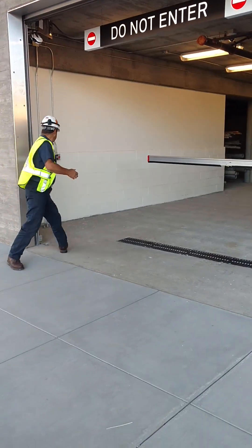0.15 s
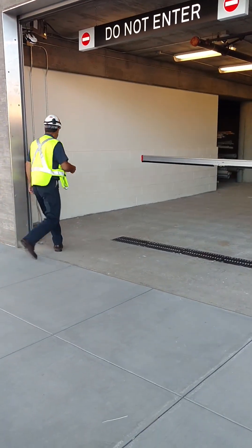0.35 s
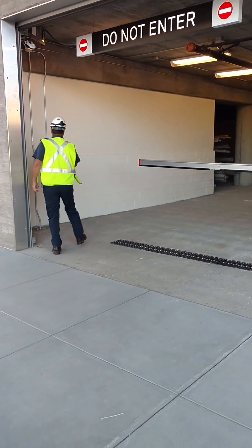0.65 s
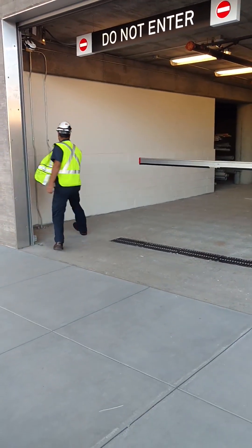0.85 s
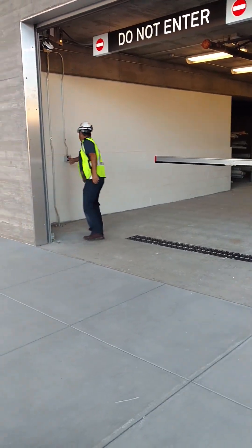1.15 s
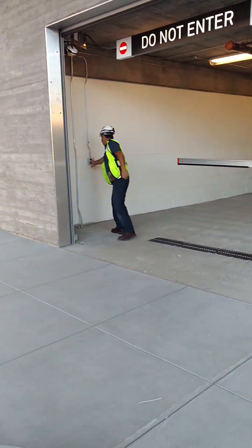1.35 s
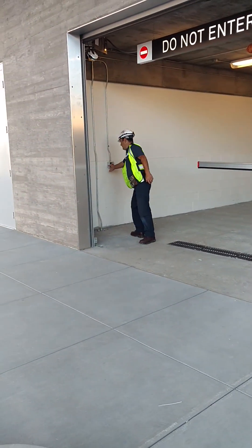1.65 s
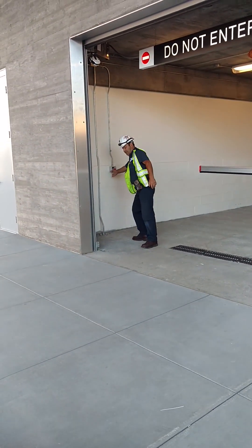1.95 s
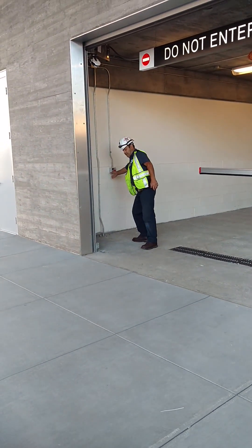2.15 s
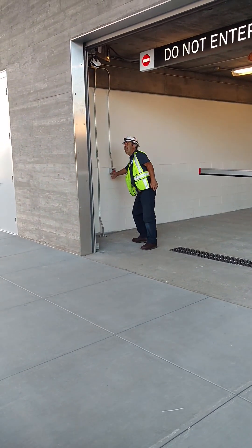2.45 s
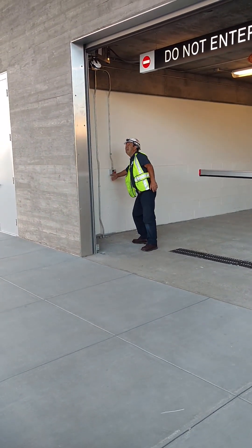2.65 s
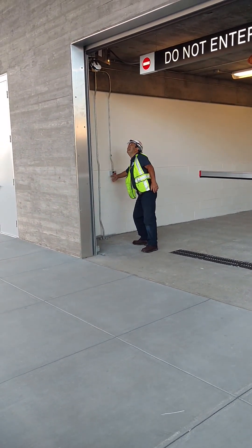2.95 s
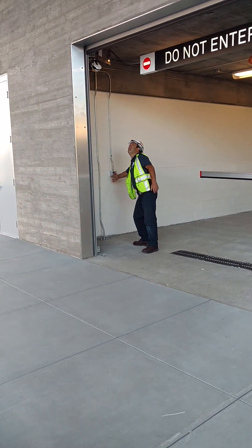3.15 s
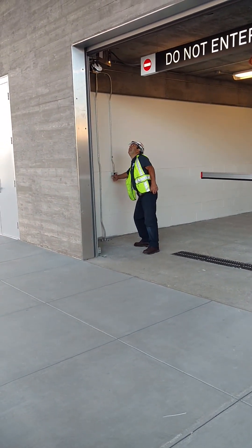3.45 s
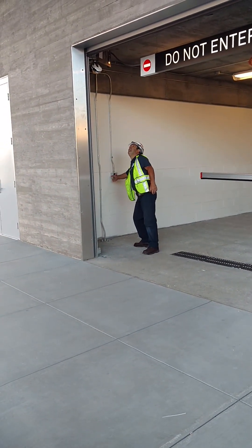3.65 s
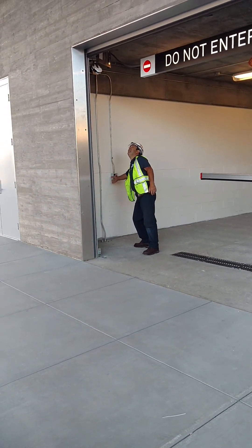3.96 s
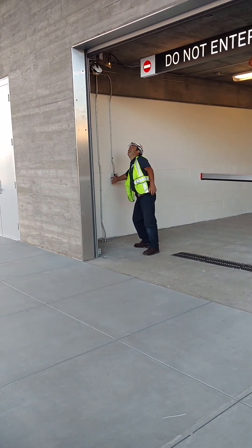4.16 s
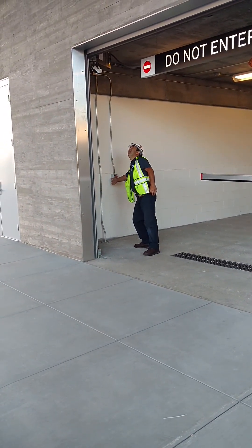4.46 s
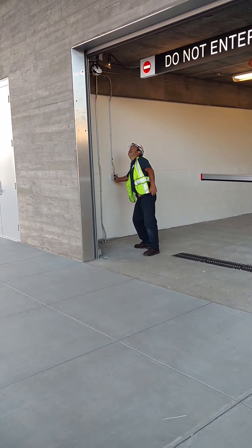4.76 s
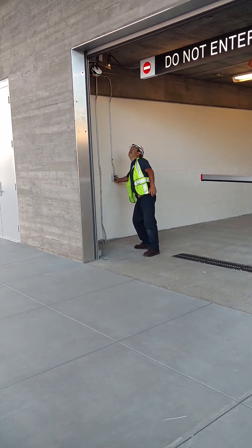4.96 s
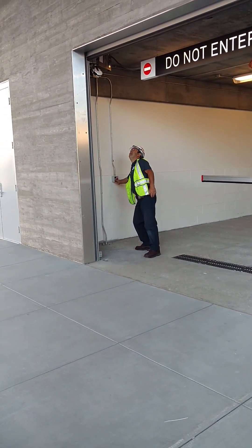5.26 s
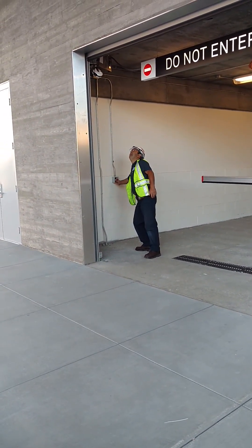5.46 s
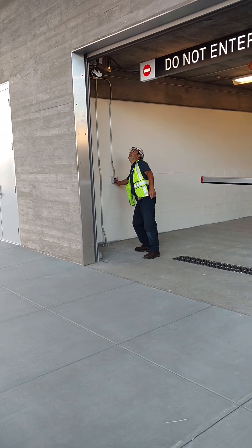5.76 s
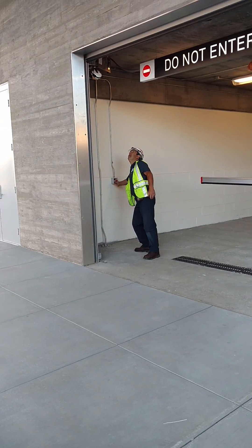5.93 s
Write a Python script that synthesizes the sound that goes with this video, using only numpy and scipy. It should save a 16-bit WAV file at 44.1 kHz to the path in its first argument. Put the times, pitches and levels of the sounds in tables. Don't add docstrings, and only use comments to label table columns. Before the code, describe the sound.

A door operator hums steadily under rushing air noise, with wavering gear whine. Sparse clicks lead to a sharp rattling crash of metal slats before two seconds, trailing knocks and tiny squeaks. It calms, then another brief hard clack comes past four seconds. A far engine sags and climbs in pitch. Semi-open concrete garage entrance, picked up by a compact stereo microphone.

```python
import sys
import numpy as np
from scipy import signal
from scipy.fft import rfft, irfft
from scipy.io import wavfile

SR = 44100
rng = np.random.default_rng(int(sys.argv[2]) if len(sys.argv) > 2 else 0)


def master_out(mix):
    frames = np.transpose(np.atleast_2d(mix))
    ceiling = np.clip(frames, -1, 1)
    pcm = np.round(ceiling * 32767).astype(np.int16)
    wavfile.write(sys.argv[1], SR, pcm)


def rack_gain(trim_db):
    fader = np.asarray(trim_db, float)
    return 10 ** (fader / 20)


N = 268682
HZ = np.fft.rfftfreq(N, 1 / SR)
TIME = np.arange(N) / SR
PORT_LAG_S = 17 / 44100

# (frequency [Hz], roar density [dB], port difference [dB])
COLOUR = [(40, -22, -21), (63, -30, -17), (113.5, -1.5, -16.5), (199, 2, -41.5), (254, 4.5, -19),
          (420, -3, -12), (620, 0.1, -10.5), (1230, -2.5, -10.5), (1600, -6, -0.5), (2830, -11.5, -1.5),
          (4340, -21, -7), (5900, -22.5, -2), (10240, -41, -1.5), (14500, -96, -2.5)]


def rms_one(x):
    return x / np.sqrt(np.mean(x ** 2) + 1e-20)


def in_time(rows):
    s, *columns = np.transpose(rows)
    return [np.interp(TIME, s, c) for c in columns]


def at_hz(points, column=1):
    points = np.array(points)
    return np.interp(np.log(HZ + 1), np.log(points[:, 0]), points[:, column])


def drift(rate_hz):
    step, settle = 40, 2000
    r = np.exp(-2 * np.pi * rate_hz * step / SR)
    chance = rng.standard_normal(N // step + settle + 2)
    slow = signal.lfilter([1], [1, -2 * r, r * r], chance)[settle:]
    return np.interp(np.arange(N) / step, np.arange(len(slow)), rms_one(slow))


def resonance(x, hz, width_hz):
    r = np.exp(-np.pi * width_hz / SR)
    poles = [1, -2 * r * np.cos(2 * np.pi * hz / SR), r * r]
    return signal.lfilter([(1 - r * r) / 2, 0, (r * r - 1) / 2], poles, x)


def band(x, low_hz, high_hz):
    return signal.sosfilt(signal.butter(2, [low_hz, high_hz], "band", fs=SR, output="sos"), x)


def swelling(swells):
    return sum(rack_gain(db) * np.exp(-((TIME - s) / half) ** 2) for s, db, half in swells)


def burst(t60):
    age = np.arange(0, .3, 1 / SR)
    return rng.standard_normal((2, len(age))) * rack_gain(-60 * age / np.clip(t60, .005, .5))


def add(out, start, piece):
    first = round(start * SR)
    out[:, first:first + piece.shape[1]] += piece[:, :N - first]


def roar(level_db, bright_db):
    # (frequency [Hz], width [Hz], level [dB])
    body = [(271.3, 16.6, -9.5), (214, 75, -16.5), (699.4, 27, -16), (409.3, 12, -17), (1665, 14, -18),
            (6604, 15, -50)]
    air = rms_one(irfft(rfft(rng.standard_normal((2, N))) * rack_gain(at_hz(COLOUR)), N))
    air = air + (rack_gain(bright_db + 0.44 * drift(12)) - 1) * band(air, 1560, 17000)
    for hz, width_hz, peak_db in body:
        ring = resonance(rng.standard_normal((2, N)), hz, width_hz)
        air = air + rack_gain(peak_db) * rms_one(ring)
    return rack_gain(level_db + .5 * drift(7.7)) * air


def motor(duck_db):
    # (time [s], whine level [dB])
    gear_load = [(0.0, -36), (0.19, -44), (0.54, -35), (1.02, -52), (1.2, -43), (1.31, -55), (1.54, -36.5),
                 (1.91, -48), (2.4, -48), (3.02, -42.5), (3.3, -58), (3.43, -42.5), (3.73, -43.5),
                 (3.9, -35), (4.46, -45), (5.0, -48.5), (5.87, -39), (6.09, -50)]
    # (multiple of shaft rate, level against the mean second order [dB])
    shaft_orders = [(3, -1.5), (4, -7), (5, -6.5), (6, -9.5), (9, -5.5)]
    # (time [s], peak [dB], half length [s])
    mesh_swells = [(0.0, -34, 0.23), (.5, -37.5, 0.27), (1.5, -44, .3), (2.55, -41, .18), (3.55, -44, .2),
                   (4.2, -40, .2), (5.85, -43, 0.16)]
    shaft_hz = 45.26
    hum_start_db, hum_fade_db_per_s, load_share, mesh_floor_db = -36.5, 1.0, 0.13, -48.5
    ease_s, ease_db = 4.35, 6.5

    whine_db, = in_time(gear_load)
    load_swing_db = whine_db - np.mean(whine_db)
    hum_db = hum_start_db - hum_fade_db_per_s * TIME + load_share * load_swing_db
    hum_db = hum_db + duck_db + 1.2 * drift(2.0)
    hum_db -= ease_db * np.clip((TIME - ease_s) / .15, 0, 1)
    mesh = rack_gain(mesh_floor_db) + swelling(mesh_swells)
    turns = 2 * np.pi * np.cumsum(shaft_hz * (1 + 0.00101 * drift(0.99))) / SR
    lines = rack_gain(hum_db) * np.sin(2 * turns)
    lines += rack_gain(whine_db + 2.5 + 2.7 * drift(9)) * np.sin(15 * turns)
    lines += mesh * rack_gain(2.8 * drift(8.3)) * np.sin(16 * turns)
    for k, db in shaft_orders:
        order_db = np.mean(hum_db) + duck_db + 1.5 + db + 1.0 * drift(3.2)
        lines += rack_gain(order_db) * np.sin(k * turns + k)
    return np.sqrt(2) * lines


def rattle():
    # (time [s], bright level [dB], middle level [dB], t60 [s])
    shakes = [(0.134, -41.5, -46, .55), (0.52, -54, -47, 0.55), (1.39, -62, -46.5, 0.9),
              (1.656, -34, -34.5, 1.0), (1.71, -45, -31.5, 1.4), (1.755, -42, -26.5, .6),
              (1.795, -34, -26, 0.2), (1.84, -47, -37, 1.5), (1.968, -44, -33, 0.73),
              (2.075, -54, -38, 0.69), (2.365, -46, -42, 0.62), (2.44, -44, -39.5, 0.58),
              (2.55, -52, -39, 0.34), (2.61, -48, -39.5, 1.4), (2.93, -51, -44, .3), (3.335, -54, -47, .7),
              (4.19, -56, -40, 0.43), (4.263, -36, -30, 0.4), (4.295, -48, -34, 0.54),
              (4.325, -45, -32, 0.49), (4.36, -52, -36, 0.7), (4.757, -55, -42.5, .6), (5.2, -57, -53, .8),
              (5.36, -59, -46, 1.2), (5.59, -63, -47, .8), (5.75, -72, -57, .8), (5.9, -65, -49, 0.46)]
    rise_s = .003
    contacts_per_s, contact_share, contact_spread_db = 1000, 0.44, 1.5

    bright_gain, middle_gain = np.zeros((2, N))
    for s, bright_db, middle_db, t60 in shakes:
        age = np.maximum(TIME - s, 0)
        shape = np.minimum(age / rise_s, 1) * rack_gain(-60 * age / t60)
        bright_gain = np.hypot(bright_gain, rack_gain(bright_db) * shape)
        middle_gain = np.hypot(middle_gain, rack_gain(middle_db) * shape)
    hits = rng.random(N) < contacts_per_s / SR
    hits = hits * rack_gain(contact_spread_db * np.minimum(rng.exponential(1, N), 4))
    grain = 1 + contact_share * rms_one(signal.lfilter([1], [1, -.93], hits))
    flutter = rack_gain(0.93 * drift(120) + 0.7 * drift(23))
    high, low = rng.standard_normal((2, 2, N)) * grain * flutter
    bright = bright_gain * rack_gain(-3.5) * rms_one(band(band(high, 6100, 10800), 6000, 15000))
    middle = middle_gain * rack_gain(3.0) * rms_one(band(low, 1680, 6060))
    return (bright + middle) * rack_gain([[0], [2.5]])


def ticks():
    # (time [s], middle peak [dB], bright peak [dB], t60 [s])
    cracks = [(0.1341, -25.5, -46, 0.03), (0.2314, -40, -48, 0.028), (0.5244, -37, -52, 0.03),
              (1.3927, -27, -56, 0.033), (1.6567, -20, -43, 0.03), (1.755, -14, -42, 0.029),
              (1.8017, -14, -41, 0.03), (1.996, -21, -48, 0.027), (2.1697, -31, -58, 0.027),
              (2.2244, -39, -52, 0.03), (2.372, -27, -50, 0.03), (2.618, -30, -45, 0.03),
              (2.7394, -35, -50, 0.023), (3.3344, -37, -59, 0.03), (4.2635, -24, -39, 0.025),
              (4.273, -19, -37, 0.025), (4.3344, -27, -42, 0.03), (4.3594, -26, -45, 0.027),
              (4.7604, -34, -50, 0.03), (4.8894, -36, -53, 0.027)]
    middle, bright = np.full((2, 2, N), 1e-18)
    for start, middle_db, bright_db, t60 in cracks:
        crack = burst(t60) + 0.06 * burst(0.34)
        add(middle, start, rack_gain(middle_db) * crack)
        add(bright, start, rack_gain(bright_db + 10.0) * (crack + .25 * burst(.12)))
    return band(middle, 2500, 8000) + band(bright, 7500, 13500)


def squeaks():
    # (start [s], end [s], frequency [Hz], width [Hz], level [dB])
    slips = [(1.001, 1.27, 2030, 840, -32), (1.653, 1.69, 5040, 700, -31),
             (1.664, 1.737, 6750, 1200, -29.5), (1.655, 1.715, 9100, 120, -40.5),
             (1.65, 1.71, 11600, 200, -46), (1.71, 2.14, 9800, 840, -47.5), (2.353, 2.4, 9440, 400, -50),
             (2.442, 2.78, 9660, 610, -53), (2.55, 2.565, 12000, 200, -50), (2.928, 3.016, 9620, 350, -56),
             (3.346, 3.391, 9680, 200, -52), (3.1, 3.95, 9680, 250, -62.5), (4.19, 4.303, 6180, 85, -41),
             (4.755, 4.78, 12300, 270, -58), (4.748, 5.708, 6600, 940, -49.5),
             (5.294, 5.453, 7320, 60, -56), (5.43, 5.66, 6170, 30, -52), (4.261, 4.451, 334, 300, -28),
             (0.949, 1.684, 215, 38, -33.5), (2.697, 2.84, 283, 30, -36), (1.693, 1.767, 1250, 510, -30)]
    out = np.zeros((2, N))
    grip = rack_gain(2.3 * drift(32))
    for start, end, hz, width_hz, level_db in slips:
        length = end - start
        age = np.arange(-.3, length + 0.089, 1 / SR)
        noise = rng.standard_normal((2, len(age)))
        tone = rms_one(resonance(resonance(noise, hz, width_hz), hz, width_hz))
        fade = np.clip(0.11 * length, .004, .08)
        shape = np.interp(age, [0, .003, length - fade, length + fade], [0.2, 0.86, 0.88, 0.14])
        add(out, start, rack_gain(level_db) * (tone * shape)[:, age >= 0])
    return out * grip


def knocks():
    # (time [s], peak [dB], frequency [Hz], t60 [s])
    pushes = [(1.706, -24, 689, 0.059), (1.802, -24.5, 1130, 0.05), (1.919, -14, 1010, 0.046),
              (2.077, -22, 630, 0.059), (2.212, -16.5, 860, 0.08), (2.224, -24, 616, 0.059),
              (2.372, -16, 1010, 0.05), (2.807, -16, 724, 0.03), (4.271, -17, 1140, 0.046),
              (4.278, -13.5, 1200, 0.05), (4.321, -18.5, 394, 0.053), (4.336, -17.5, 444, 0.039),
              (4.362, -17, 1110, 0.06), (4.375, -21, 450, 0.057), (4.431, -22, 635, 0.045)]
    out = np.zeros((2, N))
    for start, peak_db, hz, t60 in pushes:
        ring = resonance(resonance(burst(t60), hz, 0.31 * hz), hz, 0.62 * hz)
        add(out, start, rack_gain(peak_db) * ring / np.abs(ring[0]).max())
    return out


def far_engine(duck_db):
    # (time [s], firing rate [Hz], level [dB])
    engine = [(0.0, 65.8, -46), (.7, 65.6, -50), (1.1, 63.6, -47), (1.65, 62.1, -51), (2.35, 60.5, -54),
              (2.8, 56.5, -55), (3.4, 58.2, -54), (3.85, 61, -47), (4.2, 65, -44), (4.5, 68, -44),
              (4.75, 68.2, -40), (5.85, 68.6, -41.5), (6.09, 71, -37)]
    # (time [s], multiple of firing rate, peak [dB], half length [s])
    overtone_swells = [(.05, 4, -30.5, .12), (0.323, 4, -29, 0.11), (.58, 4, -31, .12), (1.1, 4, -36, .2),
                       (1.552, 4, -31, 0.18), (2.352, 4, -36.5, 0.17), (2.8, 4, -34.5, 0.22),
                       (3.387, 4, -34.5, 0.17), (3.85, 4, -34, 0.32), (4.5, 4, -36.5, 0.32),
                       (5.002, 4, -39, .15), (5.498, 4, -37.5, 0.28), (6.0, 4, -35, .3), (0.0, 9, -36, .25),
                       (.9, 9, -43, 0.18), (1.534, 9, -38.5, 0.46), (2.55, 9, -45, 0.36),
                       (3.45, 9, -37, .3), (4.8, 9, -35, .17), (5.3, 9, -33, .17), (5.698, 9, -33, .26)]
    firing_hz, effort_db = in_time(engine)
    firing = 2 * np.pi * np.cumsum(firing_hz * (1 + 0.00314 * drift(4.16))) / SR
    out = rack_gain(effort_db + duck_db + 2.5 * drift(12.0)) * np.sin(firing)
    for k in (4, 9):
        swell = swelling([(s, db, half) for s, m, db, half in overtone_swells if round(m) == k])
        out += swell * rack_gain(13.0 / k * drift(10.5)) * np.sin(k * firing)
    return np.sqrt(2) * out


def port_hiss():
    return band(rack_gain(-79) * rng.standard_normal((2, N)), 9100, 16000)


def duck():
    # (time [s], depth [dB], return time [s])
    dips = [
        (1.63, 5, 0.87),
        (2.05, 0, 0.36),
        (4.29, 3, 0.5),
        (5.9, 3, .6),
    ]
    fall_s = 0.17
    loss_db = 0
    for s, depth_db, back_s in dips:
        loss_db = loss_db + depth_db * np.interp(TIME - s, [0, fall_s, fall_s + back_s], [0, 1, 0])
    return -loss_db


def scene():
    # (frequency [Hz], share of the common part [ratio])
    lean = [(60, 0.022), (500, 0.078), (1500, 0.2), (4000, 0.62), (14000, 0.31)]
    comb_hz = 1 / PORT_LAG_S
    duck_db = duck()
    air = roar(-25.5 - 0.01 * TIME + duck_db, -0.26 - 0.5 * duck_db)
    dip = np.clip((-duck_db - 2.5) / 1.5, 0, .95)
    air = air - dip * resonance(air, comb_hz, 600)
    slats = rattle() + ticks()
    slats = slats - 0.85 * resonance(slats, comb_hz, 740)
    common, diffuse = air + slats + squeaks() + knocks() + port_hiss()
    common = common + motor(duck_db) + far_engine(duck_db)
    difference = rfft(diffuse) * rack_gain(at_hz(COLOUR, column=2))
    apart = irfft(difference + rfft(common) * at_hz(lean), N)
    return np.array([common + apart, common - apart])


def roll_off(x):
    return signal.sosfilt(signal.butter(12, 15880, fs=SR, output="sos"), x)


def record(dry):
    # (frequency [Hz], share of the other port taken away [ratio])
    cancel = [(1000, .995), (2600, .74), (5200, .76), (7800, .9), (13000, .96)]
    # (frequency [Hz], left minus right [dB])
    balance = [(60, 1), (100, -3.5), (180, -1.5), (310, -2), (550, -0.5), (950, 0), (1650, -3), (2860, -1),
               (4970, 0.5), (8640, 2), (15000, 4.5)]
    left, right = rfft(dry)
    late = np.exp(-2j * np.pi * HZ * PORT_LAG_S)
    restore = 1 / np.where(HZ * PORT_LAG_S < .5, np.abs(1 - late) + 1e-3, 2)
    taken = np.clip(at_hz(cancel), 0, 1) * late
    tilt = rack_gain(at_hz(balance) / 2)
    limits = rack_gain(np.interp(HZ, [15, 40, 15000, 15400, 16000], [-30, -0.5, 0.5, -22, -28]))
    sides = np.array([(left - taken * right) * tilt, (right - taken * left) / tilt])
    return roll_off(irfft(sides * restore * limits, N))


dry = scene()
out = record(dry)
master_out(out)
```